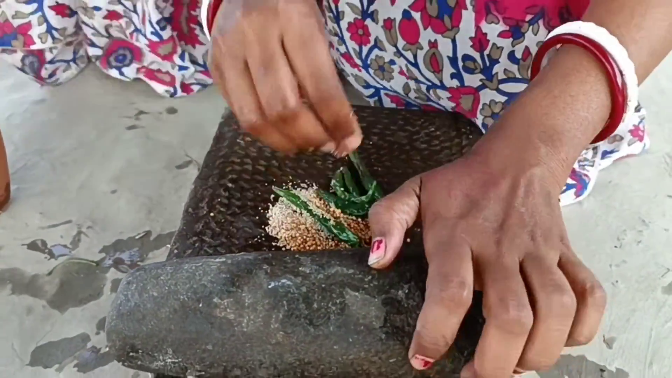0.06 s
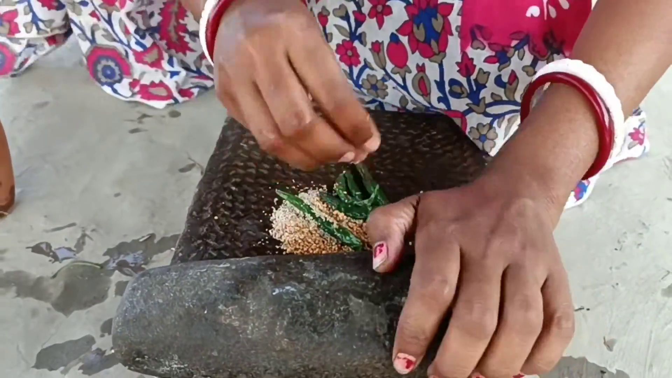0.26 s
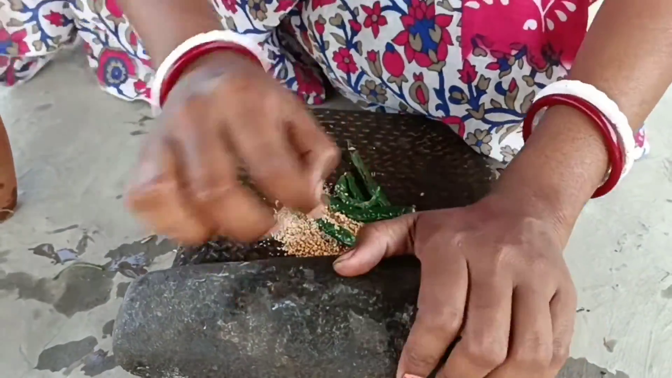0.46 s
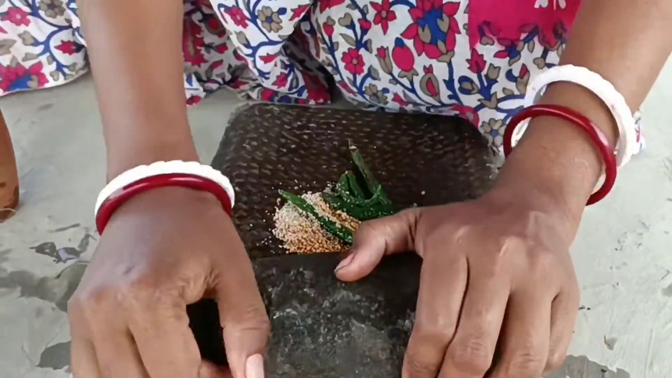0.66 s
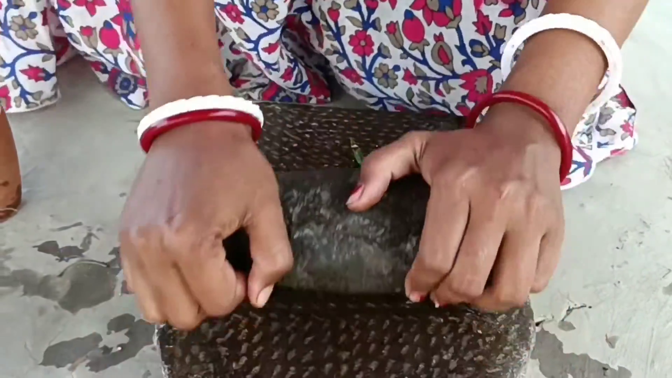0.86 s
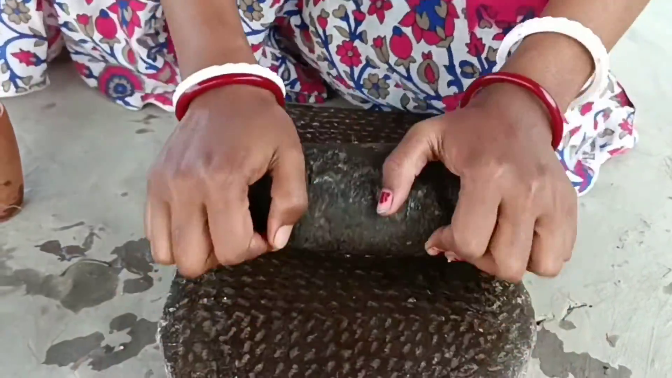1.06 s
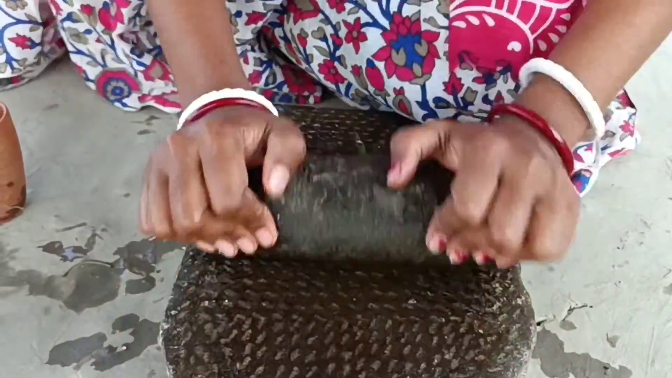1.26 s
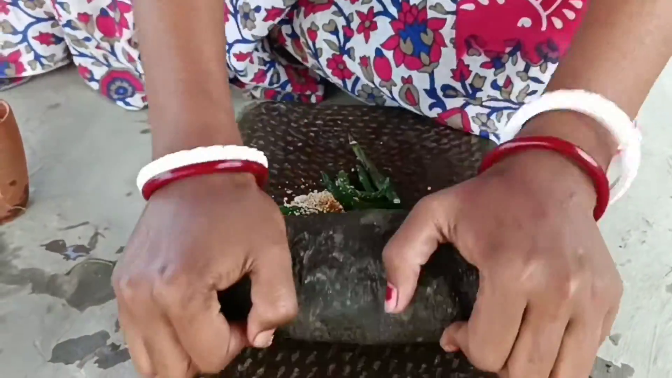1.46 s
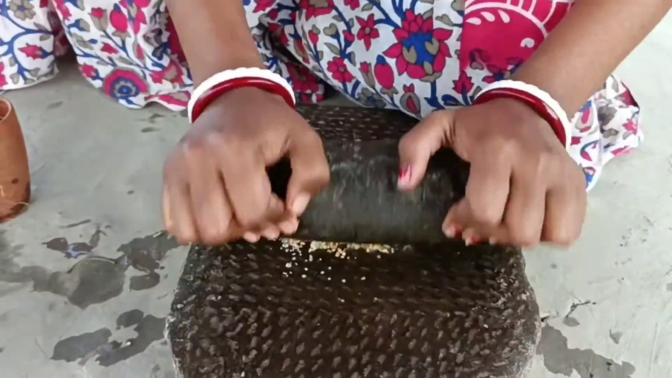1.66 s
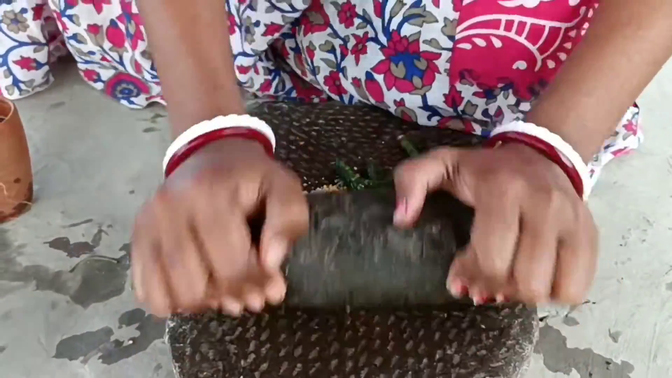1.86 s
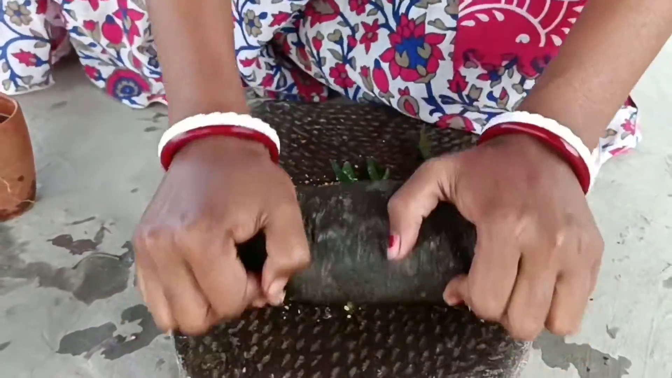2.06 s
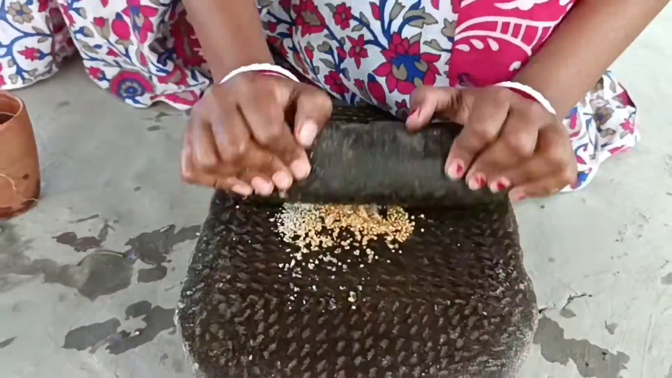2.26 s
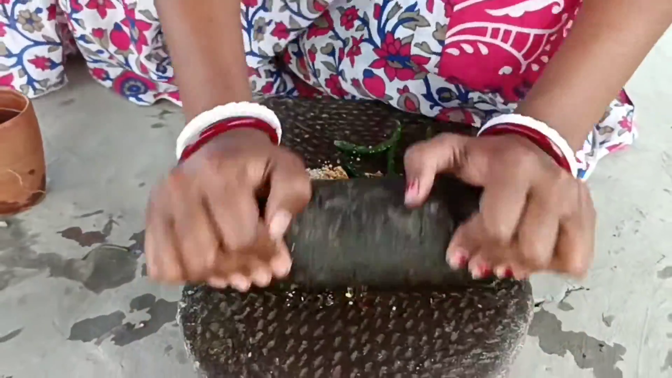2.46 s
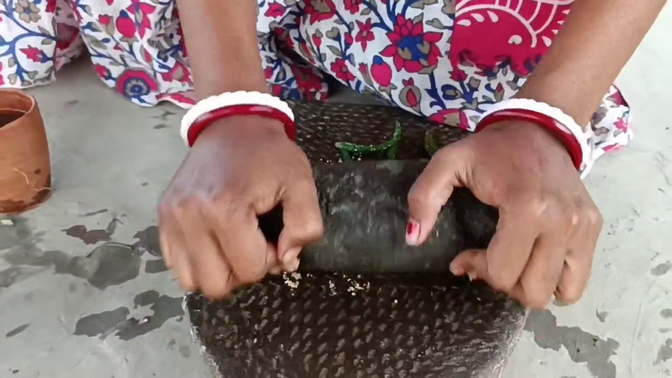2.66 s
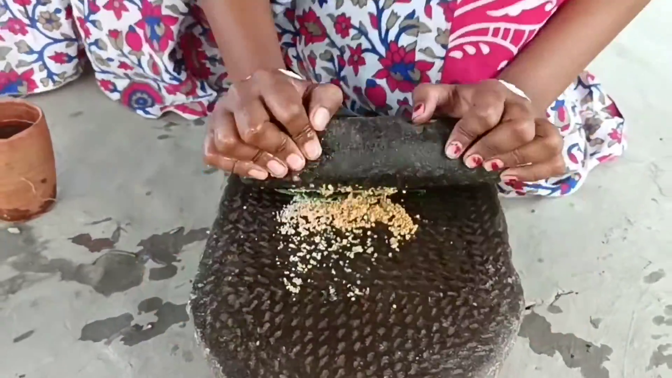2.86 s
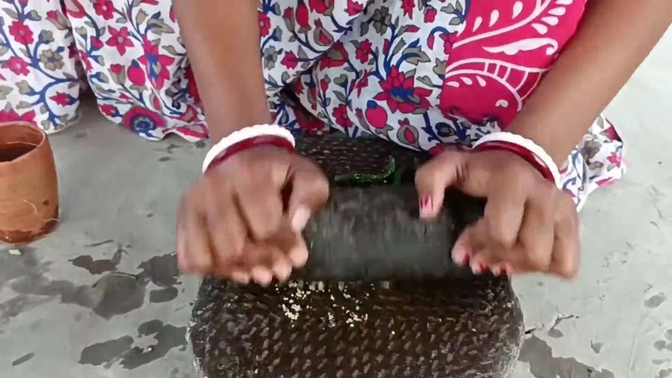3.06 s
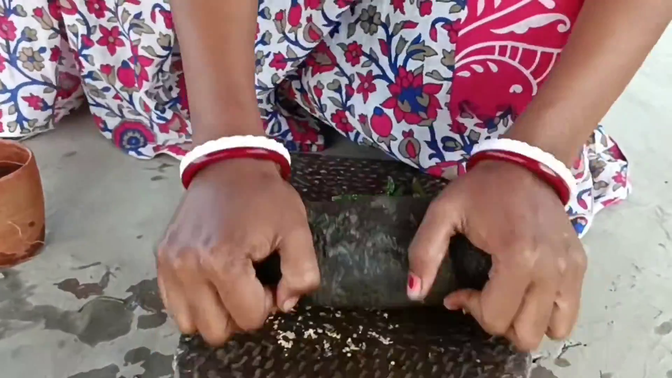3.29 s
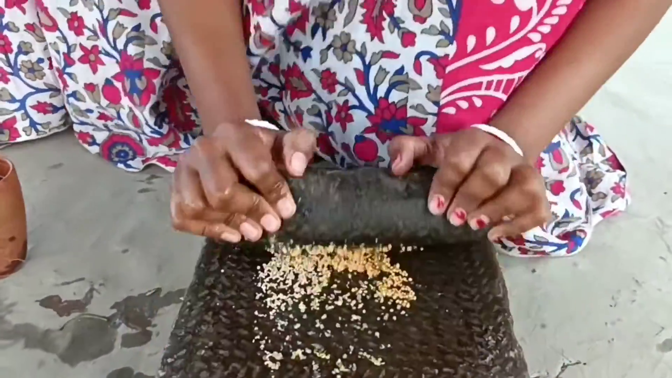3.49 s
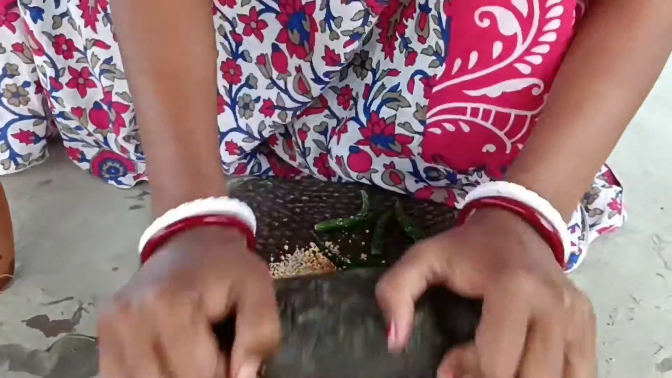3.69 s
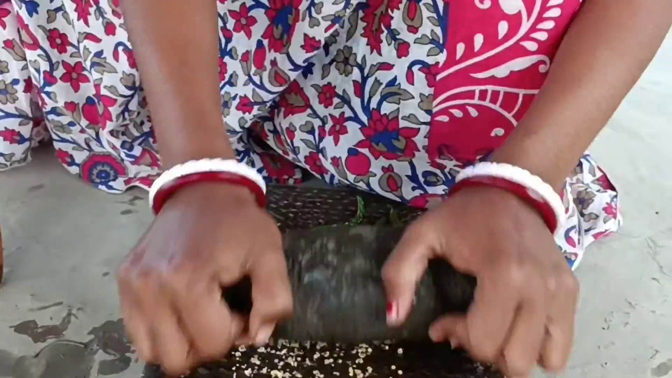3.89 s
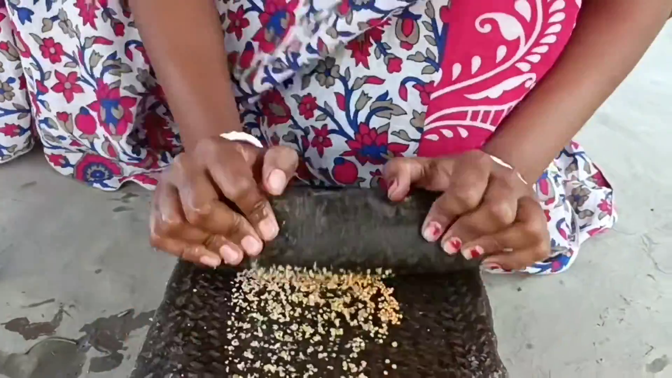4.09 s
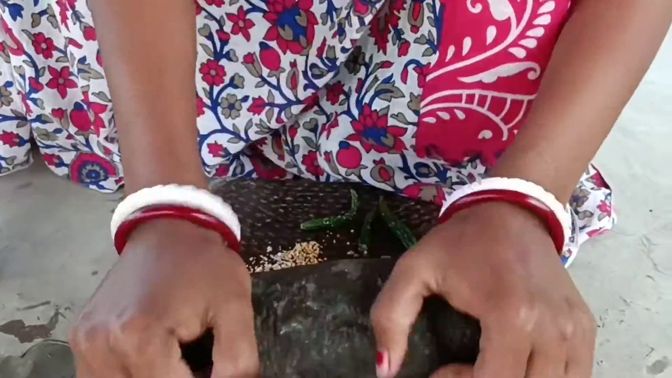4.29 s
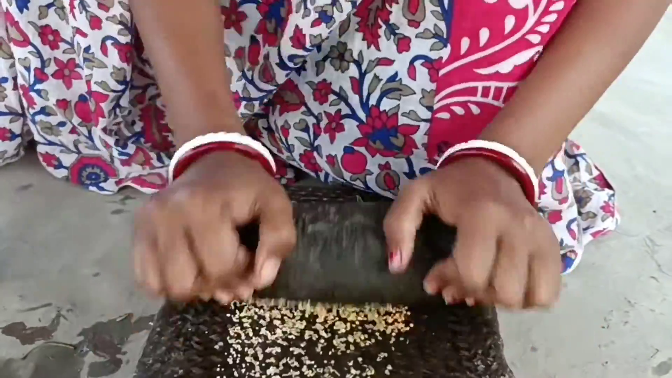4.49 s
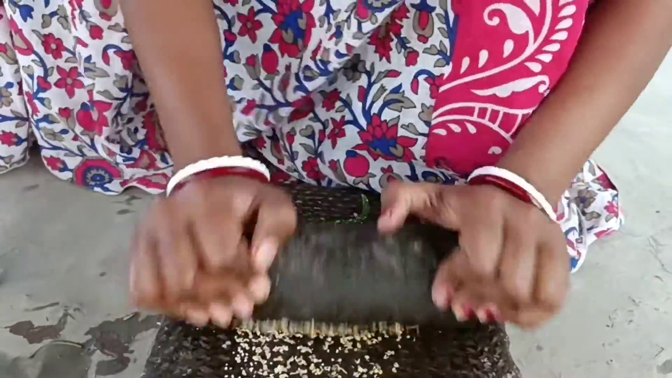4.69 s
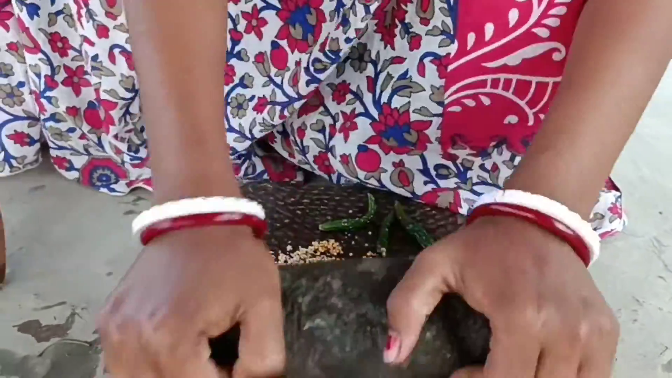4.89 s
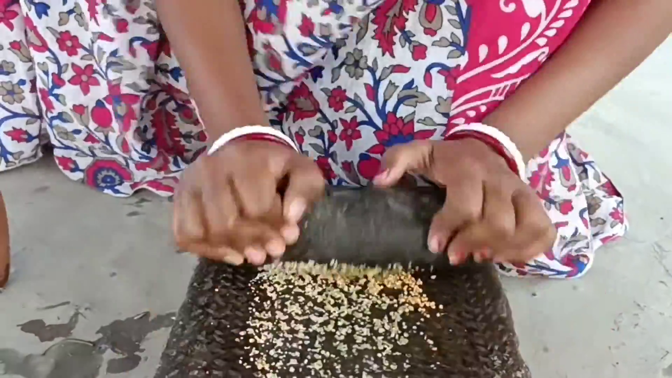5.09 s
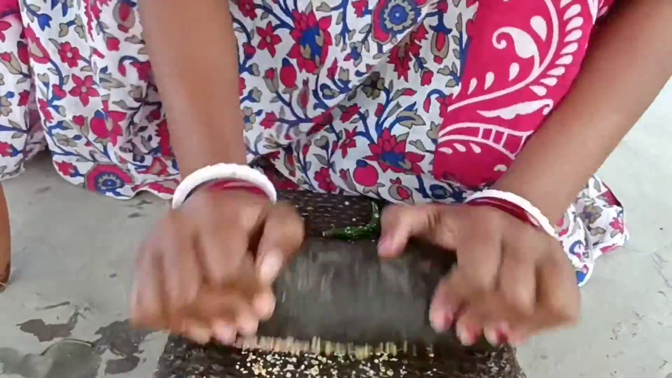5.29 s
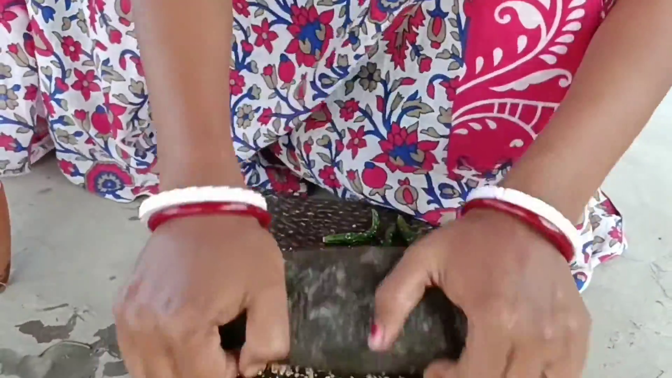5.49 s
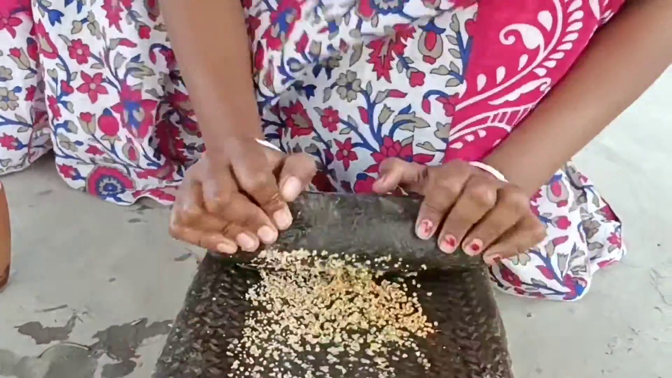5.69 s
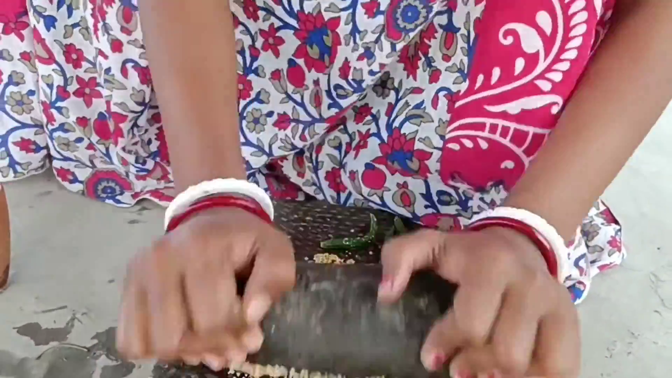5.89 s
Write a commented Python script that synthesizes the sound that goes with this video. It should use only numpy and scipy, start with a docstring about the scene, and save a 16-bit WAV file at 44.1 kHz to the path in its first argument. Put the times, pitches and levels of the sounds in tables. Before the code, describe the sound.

A stone roller grinds seeds on a pitted stone slab in rhythmic gritty crunching strokes, with stone knocks and clicking bangles, close up outdoors.

```python
"""Outdoors on a concrete floor, a stone roller is pushed and pulled over seeds and chillies on a pitted slab.
The two microphones are close: filtered random cracks run from coarse seeds into hissing flour on each push,
and back again on each lighter pull. Seeds snap and squeal; bare stone rumbles, knocks and sings as resonances.
The slab thumps on the ground as damped low tones, and bangles click as ticks with short ringing modes.
A small bird whistles and chirps far off, and low puffs of air buffet the microphone near the end."""
import sys
import numpy as np
from scipy import signal
from scipy.fft import rfft, irfft
from scipy.io import wavfile
from scipy.ndimage import uniform_filter1d

SR = 44100
rng = np.random.default_rng(int(sys.argv[2]) if len(sys.argv) > 2 else 0)


def inscribe(sig):
    """Save sig as 16-bit PCM at rate SR to the path in sys.argv[1].

    A 1-D sig is mono; a 2-D sig holds one channel per row.
    Samples are clipped to [-1, 1] before scaling.
    """
    pcm = np.round(np.clip(np.atleast_2d(sig).T, -1, 1) * 32767)
    wavfile.write(sys.argv[1], SR, pcm.astype(np.int16))


N = 261954
T = np.arange(N) / SR


def undb(db):
    """Decibels to gain."""
    return 10 ** (np.asarray(db) / 20)


def unit(x):
    """Scale so that the middle of the stereo pair has rms 1."""
    return x / np.sqrt(np.mean(np.atleast_2d(x).mean(axis=0) ** 2))


def colour(x, points, power=1):
    """Shape a sound by (frequency [Hz], gain [dB]) points."""
    hz, db = np.transpose(points)
    f = np.maximum(np.arange(N // 2 + 1) * SR / N, 1)
    gain = undb(power * np.interp(np.log(f), np.log(hz), db))
    return irfft(rfft(x) * gain, N)


def band(x, hz, width):
    """One resonance, gain 1 at its centre."""
    return signal.lfilter(*signal.iirpeak(min(hz, .45 * SR), hz / width, fs=SR), x)


def edge(x, hz, kind, order=2):
    """Low-pass or high-pass."""
    return signal.sosfilt(signal.butter(order, min(hz, .45 * SR), kind, fs=SR, output="sos"), x)


def walk(rate, size=N):
    """A random wander of spread about 1, with rate new values a second joined by straight lines."""
    knots = np.arange(0, T[size - 1] + 1, 1 / rate)
    return np.interp(T[:size], knots, rng.standard_normal(len(knots)))


def pair(side_db, size=N):
    """Random pushes as the two microphones get them: a common part and an opposed part."""
    mid, side = rng.standard_normal((2, size))
    return mid + undb(side_db) * side * np.array([[1], [-1]])


def pan(db):
    """Channel gains for a left minus right level."""
    return undb(np.array([[db], [-db]]) / 2)


def grains(rate, spread_db, side_db):
    """Tiny random impacts whose sizes are spread exponentially in decibels, up to a limit."""
    hits = rng.random(N) < rate / SR
    size = undb(spread_db * np.minimum(rng.exponential(size=N), 3.2))
    return hits * size * pair(side_db)


def add(out, s, x):
    """Mix a short sound in at time s."""
    i = int(s * SR)
    out[:, i:i + x.shape[-1]] += x[..., :N - i]


EASE = 2.004  # exponent: how softly a movement gathers and loses strength


def swell(start, length, attack, release):
    """A movement gathers strength, holds and eases to rest."""
    rise = np.sin(np.pi / 2 * np.clip((T - start) / attack, 0, 1))
    fall = np.sin(np.pi / 2 * np.clip((start + length - T) / release, 0, 1))
    return (rise * fall) ** EASE


def swells(rows):
    """Summed gain of a table of such movements."""
    return sum(undb(db) * swell(start, length, attack, release)
               for start, length, db, attack, release in rows)


# colour of the outdoor air around the floor: (frequency [Hz], gain [dB])
AIR_COLOUR = [(18, -32.5), (30, -19), (81, 5.5), (426, -8), (497, -5.5), (1170, -12.5), (2310, -9),
              (5730, -16.5), (13200, -36.5), (15000, -17.5)]
AIR_DB = -65  # middle of the air's wandering level
# air puffs on the microphone: (start [s], length [s], level [dB], attack [s], release [s])
AIR_PUFFS = [(5.22, 0.18, -51.5, .03, 0.057), (5.52, 0.38, -56, 0.021, 0.24),
             (5.81, 0.13, -44, 0.038, 0.028)]


def air():
    """Outdoor air is quiet coloured noise; puffs on the microphone are bursts of low noise, mostly at the left."""
    still = unit(colour(pair(-2.5), AIR_COLOUR)) * undb(AIR_DB + 4.55 * walk(27))
    puffs = unit(edge(band(pair(-10.0), 87.7, 63), 75, "low")) * swells(AIR_PUFFS)
    return still + pan(18.4) * puffs


# whistle of the far bird: (time [s], pitch [Hz], level [dB])
BIRD_WHISTLE = [(.24, 3430, -96), (.275, 2940, -57), (.31, 2700, -65), (.36, 2655, -61), (.385, 2750, -87)]
# its raspy chirps: (time [s], level [dB])
BIRD_CHIRPS = [(.19, -61), (.33, -63.5), (.45, -62), (.56, -63.5), (.67, -66)]


def bird():
    """Far off, a gliding sine makes a falling whistle among spaced chirps of narrow noise."""
    s, hz, db = np.transpose(BIRD_WHISTLE)
    phase = 2 * np.pi * np.cumsum(np.interp(T, s, hz)) / SR
    sounding = (T > s[0]) * (T < s[-1])
    whistle = np.sqrt(2) * np.sin(phase) * undb(np.interp(T, s, db)) * sounding
    rasp = unit(band(band(pair(-0.48), 4360, 2000), 3700, 2100))
    return whistle + rasp * sum(undb(db) * np.exp(-((T - s) / 0.019) ** 2) for s, db in BIRD_CHIRPS)


# low thumps: the slab rocks on the ground, and the first two are hands set down on it; # the pitch starts 1.4
# times above the listed one and sinks toward 0.54 of it: # (time [s], peak [dB], reference pitch [Hz])
LOW_THUMPS = [(0.035, -53.5, 91), (.425, -50, 85), (1.423, -31, 157), (1.734, -36.5, 115),
              (1.941, -30.5, 180), (2.267, -42, 104), (2.564, -40.5, 143), (3.457, -41.5, 124),
              (3.769, -53, 147), (4.026, -35.5, 195), (4.054, -37, 129), (4.451, -27.5, 194),
              (4.563, -36, 111), (4.821, -45, 174), (5.115, -38, 141), (5.434, -40, 101),
              (5.529, -36, 187), (5.652, -37.5, 121), (5.844, -54, 86), (5.901, -45, 89)]


def thumps():
    """The slab settles on the ground, or hands are set down on it: a dull, heavily damped rocking that slows as
    it dies, with a short rattle."""
    out, t = np.zeros((2, N)), T[:SR // 4]
    for s, db, hz in LOW_THUMPS:
        slowing = 0.537 + 0.86 * np.exp(-t / 0.016)
        rock = np.sin(2 * np.pi * np.cumsum(hz * slowing) / SR) * np.exp(-t / 0.022)
        rattle = unit(edge(band(pair(-11, len(t)), hz, 140), 274, "low")) * np.exp(-t / 0.02)
        x = (rock + 0.53 * rattle) * (1 - np.exp(-t / 0.00071))  # soft onset
        add(out, s, undb(db) * x / np.abs(x).max())
    return pan(1.6) * out


# bangles click together: (time [s], peak [dB], sparkle gain near 15.5 kHz [dB])
BANGLE_CLICKS = [(.4783, -47, -9), (0.9434, -24.5, -15), (1.1036, -37, -6), (1.5228, -20.5, -25),
                 (1.5685, -16, -14), (1.636, -19.5, 2), (2.121, -27, -1), (2.5625, -16, -11),
                 (2.8853, -32, -16), (3.1587, -14.5, -4), (3.1944, -26, -20), (3.3423, -24, 8),
                 (3.6964, -22, -14), (3.7635, -14, -8), (3.919, -27, 0), (4.3129, -18, -8),
                 (4.348, -14.5, -4.5), (4.833, -11, 0), (5.1666, -14.5, -19), (5.4363, -16, -30),
                 (5.458, -21, -21), (5.489, -12.5, -11.5), (5.7194, -19.5, -25), (5.9294, -25, -6)]
# ringing modes of free bangles: (frequency [Hz], time to fall 60 dB [s], strength [dB])
BANGLE_MODES = [(1600, 0.077, -19), (3260, 0.14, -17), (3870, 0.25, -16), (4450, 0.045, 4.5),
                (4620, 0.12, 2.5), (6000, 0.031, -4), (7400, 0.089, 8), (7650, 0.056, -22),
                (8410, 0.058, 5), (9400, 0.029, -3), (11900, 0.14, -21), (11970, 0.031, -31),
                (15100, 0.21, -2), (14560, 0.073, 0)]
RING_DB, RING_SPREAD_DB = -18, 1.5  # gain of the ring in the mix; spread of each mode from touch to touch
SKIN_DAMPING_S = .045  # extra decay as the wrist mutes the ring


def bangles():
    """A hard tick, a brief rattle and a short muted ring, different at every touch."""
    out, t = np.zeros((2, N)), T[:SR // 5]
    hz, t60, mode_db = np.transpose(BANGLE_MODES)[:, :, None]
    for s, db, sparkle_db in BANGLE_CLICKS:
        detune, strength = rng.standard_normal((2, len(hz), 1))
        modes = undb(mode_db + RING_SPREAD_DB * strength) * np.sin(2 * np.pi * hz * (1 + .015 * detune) * t)
        modes = modes * np.exp(-np.log(1000) * t / t60 - t / SKIN_DAMPING_S)
        ring = np.sign(pair(0, len(hz))) @ modes  # each mode reaches the microphones in step or opposed
        tick = pair(-0.9, len(t)) * (np.exp(-t / 0.0016) + 1.05 * np.exp(-t / 0.00027))
        rattle = pair(-0.92, len(t)) * np.exp(-t / 0.015) * undb(2.4 * walk(570)[:len(t)])
        x = undb(RING_DB) * ring + 0.32 * edge(tick + 0.55 * rattle, 4000, "high")
        x += 4.1 * undb(sparkle_db) * band(tick, 15500, 1200)
        add(out, s, undb(db) * x / np.abs(x).max())
    return out


# the dragged roller sings faintly: (start [s], length [s], first pitch [Hz], last pitch [Hz], level [dB])
ROLLER_SINGS = [(0.972, 0.3, 2200, 2216, -61.5), (1.398, 0.3, 2480, 2253, -51),
                (1.426, 0.45, 670, 626, -56), (1.921, 0.27, 2324, 2200, -49.5),
                (1.926, 0.26, 680, 638, -58.5), (3.103, 0.24, 720, 590, -61.5),
                (4.28, 0.28, 957, 940, -69.5), (4.281, .2, 1455, 1410, -69), (4.282, .2, 2430, 2380, -69),
                (5.061, 0.34, 640, 700, -58)]
SING_CUTOFF_HZ = 74  # low-pass on the wander that roughens the tone


def singing():
    """Light sliding friction keeps one narrow stone resonance going; it glides as the contact moves."""
    out = np.zeros((2, N))
    for start, length, first_hz, last_hz, db in ROLLER_SINGS:
        size = int(length * SR)
        phase = 2 * np.pi * np.cumsum(np.linspace(first_hz, last_hz, size)) / SR
        a, b = (edge(pair(-7, size), SING_CUTOFF_HZ, "low") for _ in range(2))
        tone = a * np.sin(phase) + b * np.cos(phase)
        add(out, start, undb(db) * unit(tone * np.sin(np.linspace(0, np.pi, size))))
    return out


# a seed sticks and squeals under the roller: (time [s], level [dB], centre pitch [Hz], length [s])
SEED_SQUEALS = [(1.28, -25, 3460, 0.016), (1.297, -20, 3490, 0.011), (1.816, -22, 3660, 0.0084),
                (1.823, -15.5, 3797, 0.011), (2.194, -36, 4540, 0.0027), (2.391, -27.5, 4050, 0.033),
                (2.417, -34, 3850, .018), (3.491, -37, 3880, 0.0047), (3.566, -38, 3070, 0.02),
                (3.636, -31, 4000, 0.03), (5.151, -36, 3300, 0.0059), (5.225, -30, 3160, 0.015),
                (5.235, -28, 5940, .005), (5.696, -31, 3700, 0.0066), (5.726, -31, 2940, 0.0082),
                (5.789, -27.5, 3660, 0.0038)]


def squeals():
    """Fast stick and slip: a brief rough tone that wanders in pitch and strength."""
    out = np.zeros((2, N))
    for s, db, hz, length in SEED_SQUEALS:
        size = int(length * SR)
        phase = 2 * np.pi * np.cumsum(hz * (1 + 0.175 * walk(1203)[:size])) / SR
        arc = np.sin(np.linspace(0, np.pi, size)) ** .6
        strength = arc * undb(3 * np.tanh(walk(800)[:size]))
        tone = strength * np.sin(phase + np.array([[0], [1.1]]))  # phase offset between microphones [rad]
        add(out, s, undb(db) * unit(tone))
    return out


# resonances of roller and slab: (frequency [Hz], width [Hz], strength [dB])
STONE_MODES = [(363, 78, -8), (552, 140, -2.5), (631, 58, 0), (731, 61.5, 5.5), (832, 60, 1.5),
               (935, 106, -1.5), (1119, 55, -2.5), (1189, 37, 0.5), (1310, 169, -5), (1410, 90, -13),
               (1740, 193, -7), (1982, 78, -8), (2272, 93, -7.5), (2614, 60, -9), (3520, 68, -27),
               (5380, 102, -5.5), (6680, 120, -23.5)]
CONTACT_DB, CONTACT_PER_S = 2, 14  # each mode swells and fades as the point of contact moves


def stone(push, side_db=-3, cross_hz=1700):
    """Roller and slab ring; their higher modes reach the two microphones out of step."""
    ring = 0
    for k, (hz, width, db) in enumerate(STONE_MODES):
        contact_db = CONTACT_DB * walk(CONTACT_PER_S, size=push.shape[-1])
        ring = ring + (-1) ** (k // 2) * undb(db + contact_db) * band(push, hz, width)
    ring = edge(ring, 384, "high")
    side = np.roll(edge(ring.mean(axis=0), cross_hz, "high", order=3), SR // 2000)  # half a millisecond late
    return ring + undb(side_db) * side * np.array([[1], [-1]])


# the roller drops on the slab: (time [s], peak [dB], hardness as gain near 2.5 kHz [dB], chatter decay [s])
ROLLER_KNOCKS = [(0.7, -57, 8.5, .018), (1.362, -13.5, 11, 0.023), (1.3817, -11, 21.5, 0.038),
                 (1.904, -12.5, 9, 0.027), (2.0506, -28.5, -10, 0.055), (2.518, -12, 12.5, 0.012),
                 (2.5332, -16, 37, 0.022), (2.853, -42, 34, .008), (2.888, -36, 17, 0.022),
                 (3.29, -31.5, 31, 0.035), (4.021, -34.5, 1, 0.019), (4.076, -29.5, 18, .019),
                 (4.449, -30.5, -18, 0.026), (5.1653, -27.5, 18, 0.018), (5.183, -29.5, 15, .025),
                 (5.722, -26, 25, 0.032)]
CHATTER_DB = -9.5  # small rebounds relative to the blow, before they die away


def knocks():
    """A sharp blow, then the roller chatters to rest; harder contact brings out the modes near 2.5 kHz."""
    out, t = np.zeros((2, N)), T[:SR // 4]
    for s, db, hard_db, decay in ROLLER_KNOCKS:
        rebounds = (rng.random(len(t)) < 900 / SR) * pair(-2.3, len(t))
        chatter = rebounds * np.exp(-t / decay) * (t > .0025)
        ring = stone((t == 0) + undb(CHATTER_DB) * chatter)
        ring = edge(ring + undb(hard_db) * band(ring, 2510, 520), 4500, "low", order=4)
        add(out, s, undb(db) * ring / np.abs(ring).max())
    return out


# bare stone rolls over the pits: (start [s], length [s], level [dB], attack [s], release [s])
BARE_ROLLS = [(.68, 0.34, -28.5, 0.13, 0.16), (1.485, 0.18, -30.5, 0.042, 0.16),
              (2.042, .12, -33, 0.03, 0.083), (2.635, 0.11, -37, 0.054, 0.051),
              (3.284, 0.061, -36.5, 0.012, 0.059), (4.07, 0.086, -48.5, 0.011, .06),
              (5.718, 0.026, -39.5, 0.009, .018)]


def rolling(grit_db):
    """Bare stone bumps over the pits of the slab, catching now and then; through the seeds it only murmurs."""
    catches = undb(0.93 * walk(70) + 2 * walk(260))
    impacts = grains(rate=2200, spread_db=-1.0, side_db=-5.5) * catches
    bumps = unit(stone(impacts, side_db=-1.5, cross_hz=1700))
    effort = undb(0.59 * grit_db)
    bare = swells(BARE_ROLLS)
    ground = unit(edge(band(pair(-25.5), 120, 130), 294, "low")) * undb(2.9 * walk(15))
    return bumps * (bare + undb(-50) * effort) + pan(2) * ground * (undb(-33) * bare + undb(-51) * effort)


# the roller is pushed out through the seed pile:
# (start [s], length [s], level [dB], attack [s], release [s], extra flour hiss [dB])
PUSH_STROKES = [(1.205, 0.23, -31, 0.13, 0.18, 0.5), (1.755, 0.23, -28, 0.11, 0.18, 0),
                (2.335, 0.28, -33, 0.067, 0.19, 3), (2.925, 0.26, -29.5, 0.11, 0.081, -3),
                (3.53, 0.23, -28.5, 0.12, 0.071, 3.5), (4.09, 0.25, -29.5, 0.085, 0.11, 4.5),
                (4.632, 0.2, -27.5, 0.083, 0.1, 0.5), (5.195, 0.23, -26, 0.12, 0.12, -1.5),
                (5.755, .21, -27, 0.089, 0.1, -1.5)]
# and is drawn back, more lightly: (start [s], length [s], level [dB], attack [s], release [s], extra hiss [dB])
PULL_STROKES = [(1.06, 0.27, -54.5, 0.038, .04, -23.5), (1.39, 0.41, -42, 0.24, 0.099, -10),
                (2.1, 0.22, -30.5, 0.19, 0.087, -8.5), (2.64, 0.26, -35, 0.16, 0.089, -5.5),
                (3.29, 0.25, -39.5, 0.14, 0.087, -4), (3.86, 0.26, -34.5, 0.15, 0.16, -0.5),
                (4.39, 0.24, -32.5, 0.13, .1, -1), (4.92, 0.29, -39, 0.1, 0.16, -2.5),
                (5.46, 0.28, -37, 0.14, 0.066, -1.5)]
# at the far end it rocks over in the flour before turning back:
# (start [s], length [s], level [dB], attack [s], release [s], extra hiss [dB])
FAR_TURNS = [(3.14, 0.079, -45, .02, 0.03, -9), (3.745, 0.18, -49.5, 0.01, 0.027, -6),
             (4.29, 0.15, -50.5, .02, 0.14, -7), (4.79, 0.082, -40.5, 0.038, 0.067, -8.5)]
# fine hiss relative to the grit, whole seeds near and flour far: (start [dB], middle [dB], end of stroke [dB])
PUSH_HISS = (-25.5, -17.5, 0.5)
PULL_HISS = (3.5, -7.5, -36)
TURN_HISS = (4, 6.5, 10)
# change of level over one stroke: the bed of seeds thins away from the pile
PUSH_SWELL_DB, PULL_SWELL_DB, TURN_SWELL_DB = -6, 11.5, 10
# a large seed or a chilli gives way in a burst of grit: (time [s], level [dB], decay [s], fine hiss [dB])
GRIT_BURSTS = [(1.359, -31, 0.0074, 1.5), (1.895, -31, 0.0072, 10), (2.193, -41, 0.0064, -15),
               (2.273, -30.5, 0.02, -27), (2.853, -29.5, 0.013, -40), (3.493, -32.5, 0.0039, -22),
               (3.551, -34.5, 0.046, -26), (3.64, -28.5, 0.036, -19), (4.66, -40, 0.028, -28),
               (5.694, -36, 0.011, -34), (5.739, -35.5, .04, -31), (5.789, -29.5, 0.016, -12)]
CRUMBS_DB, CRUMBS_S = -21, 0.11  # loose crumbs stir just ahead of and behind each stroke


def strokes():
    """Level of the grit and its fine hiss (dB), both following the roller between the seed pile and the flour."""
    parts = []  # (gain, fine hiss [dB])
    for rows, swell_db, hiss_db in ((PUSH_STROKES, PUSH_SWELL_DB, PUSH_HISS),
                                    (PULL_STROKES, PULL_SWELL_DB, PULL_HISS),
                                    (FAR_TURNS, TURN_SWELL_DB, TURN_HISS)):
        for start, length, db, attack, release, flour_db in rows:
            travel = np.clip((T - start) / length, 0, 1)
            gain = undb(db + swell_db * (travel - .5)) * swell(start, length, attack, release)
            parts.append((gain, flour_db + np.interp(travel, (0, .5, 1), hiss_db)))
    for s, db, decay, hiss_db in GRIT_BURSTS:
        parts.append((undb(db) * (T > s) * np.exp(-np.abs(T - s) / decay), hiss_db))
    width = int(CRUMBS_S * SR)

    def with_crumbs(p):
        """Spread a little of the power over the time around it."""
        return p + undb(2 * CRUMBS_DB) * uniform_filter1d(uniform_filter1d(p, width), width)

    power = with_crumbs(sum(gain ** 2 for gain, _ in parts)) + 1e-10  # tiny floor keeps the logarithm finite
    fine_db = with_crumbs(sum(gain ** 2 * hiss_db for gain, hiss_db in parts)) / power
    return 10 * np.log10(power), fine_db


SNAPS_PER_S, SNAP_DB = 45, 19  # average rate; spike gain above the grit level, before filtering


def snapping(grit_db):
    """Now and then a whole seed snaps: a single dry spike, well above the small cracks."""
    spikes = (rng.random(N) < SNAPS_PER_S / SR) * rng.uniform(-1.04, 1, (2, N))
    return edge(edge(spikes, 2200, "high"), 8700, "low", order=4) * undb(grit_db + SNAP_DB)


# colour of crushing seeds: (frequency [Hz], level [dB])
SEED_GRIT = [(400, -41), (750, -22), (1000, -24.5), (1300, -12.5), (2000, -7), (2500, -7.5), (3400, -2),
             (4500, -3), (7000, -4), (8300, -11), (11000, -14.5), (13600, -23), (14700, -7.5), (15700, -10)]
# the seeds spread and the roller bears down harder: (time [s], change of the crunch below 2.2 kHz [dB])
ROLLER_BEARING = [(1.3, 0), (2.4, -2.5), (3.1, -2.5), (3.7, -1), (4.2, 0.5), (4.7, -0.5), (5.3, -0.5),
                  (5.9, -3)]
# left minus right of the grit: (frequency [Hz], level difference [dB])
SEED_PAN = [(300, 2), (700, 5), (2300, 9.5), (4400, -2), (6000, -6), (9000, 6.5), (13000, 0)]
# how far each register follows the fine hiss: (frequency [Hz], share [ratio])
HISS_SHARE = [(1500, -0.095), (3000, -0.28), (5000, 0.14), (7000, 0.33), (9000, 0.77), (11000, 0.75),
              (15000, 0.88)]
TOP_HZ = 16000  # upper edge of the highest band


def grinding(level_db, fine_db):
    """Seeds crack in uneven bunches, each with its own colour; as they turn to flour the crunch gives way to hiss."""
    bearing_db = np.interp(T, *np.transpose(ROLLER_BEARING))
    bunching = undb(0.51 * walk(45) + 0.9 * walk(420))
    cracks = grains(rate=5500, spread_db=0.5, side_db=-.5) * bunching
    edges = np.linspace(np.sqrt(400), np.sqrt(TOP_HZ), num=27) ** 2  # bands widen upward
    out, before = 0, walk(45)
    for lo, hi in zip(edges, edges[1:]):
        hz, own = np.sqrt(lo * hi), walk(45)
        tone_db, share, pan_db = (np.interp(hz, *np.transpose(table))
                                  for table in (SEED_GRIT, HISS_SHARE, SEED_PAN))
        db = level_db + tone_db + share * (fine_db + 12.0)
        db = db + bearing_db * (hz < 2200) + 2.0 * (own + before)
        crunch = signal.sosfilt(signal.butter(3, [lo, hi], "band", fs=SR, output="sos"), cracks)
        out = out + unit(crunch) * np.sqrt((hi - lo) / 3300) * undb(db) * pan(pan_db)
        before = own  # neighbouring bands swell together
    return out


FLOOR_ECHO_S, FLOOR_ECHO_DB = 0.0024, -15.5
YARD_T60_S, YARD_ECHO_DB = 0.056, -13.0  # time to fall 60 dB; level of the wall echoes


def scene():
    """All the sounds of the grinding, with a quick echo off the floor and weak ones from nearby walls."""
    grit_db, fine_db = strokes()
    bright = grinding(grit_db, fine_db) + snapping(grit_db) + bangles()
    add(bright, FLOOR_ECHO_S, undb(FLOOR_ECHO_DB) * bright)
    near = bright + rolling(grit_db) + singing() + knocks() + squeals() + thumps()
    t = T[:SR // 3]
    echo = edge(pair(0, len(t)), 9100, "low") * np.exp(-np.log(1000) * t / YARD_T60_S) * (t > .003)
    echo /= np.sqrt(np.sum(echo ** 2) / 2)
    walls = undb(YARD_ECHO_DB) * signal.fftconvolve(near, echo, axes=1)[:, :N]
    return near + walls + bird() + air()


def record(dry):
    """The recorder thins the deepest bass and cuts the top above 16 kHz."""
    thin = edge(dry, 41, "high")
    return signal.sosfilt(signal.ellip(10, .2, 70, 16000, fs=SR, output="sos"), thin)


dry = scene()
out = record(dry)
inscribe(out)
```